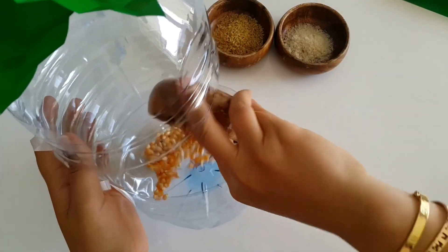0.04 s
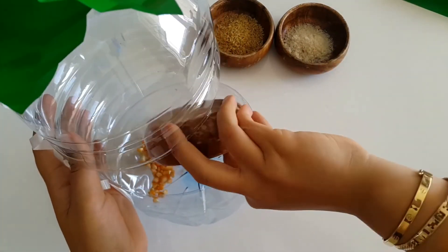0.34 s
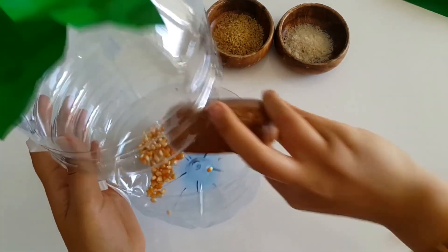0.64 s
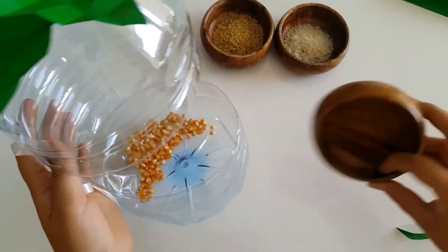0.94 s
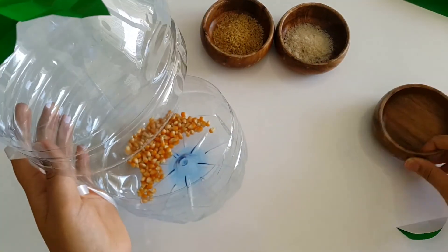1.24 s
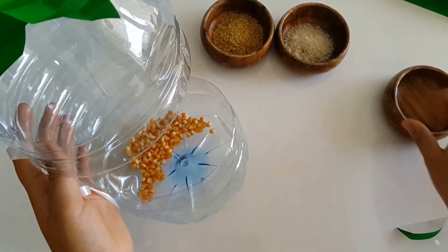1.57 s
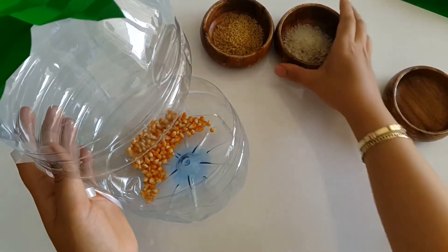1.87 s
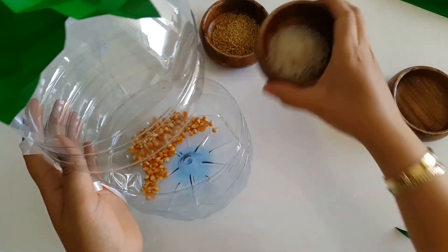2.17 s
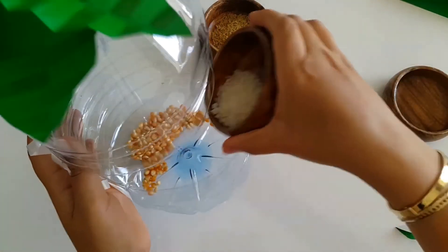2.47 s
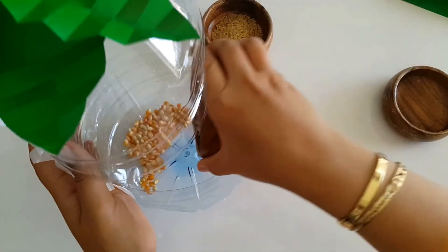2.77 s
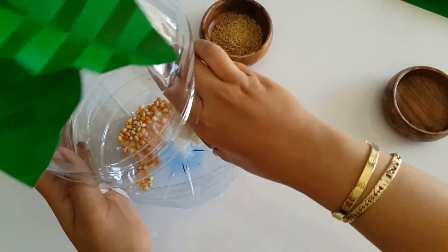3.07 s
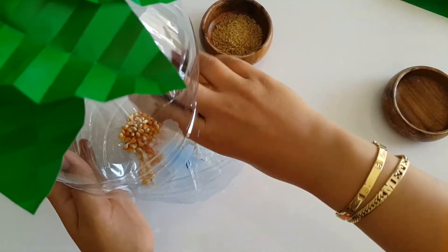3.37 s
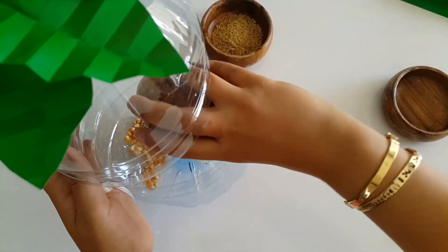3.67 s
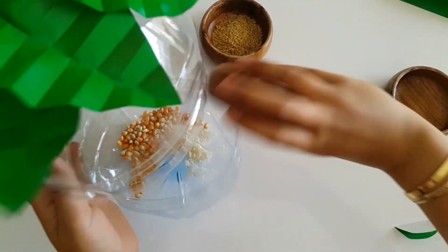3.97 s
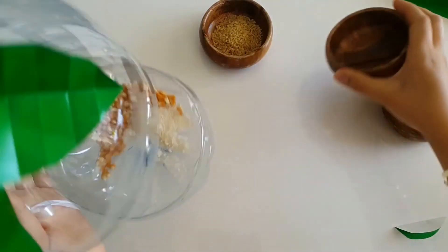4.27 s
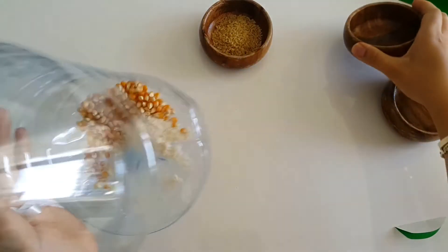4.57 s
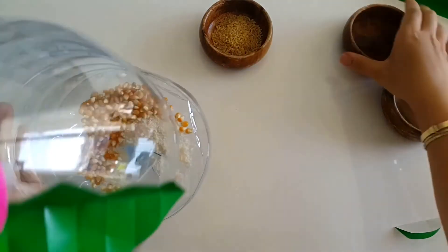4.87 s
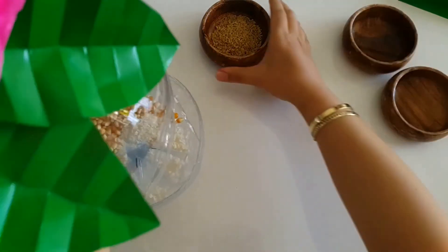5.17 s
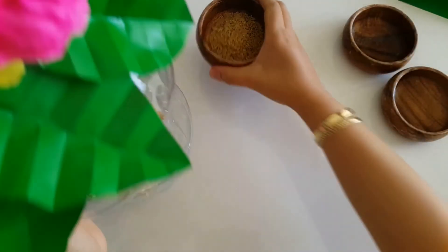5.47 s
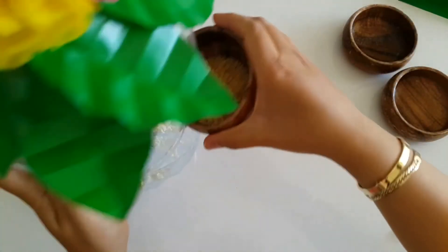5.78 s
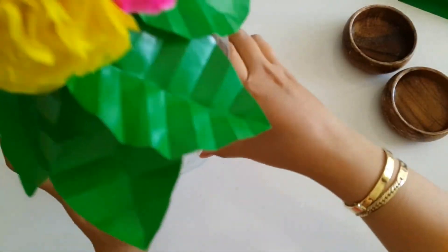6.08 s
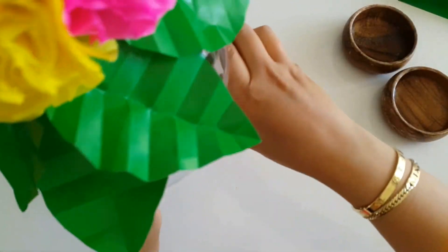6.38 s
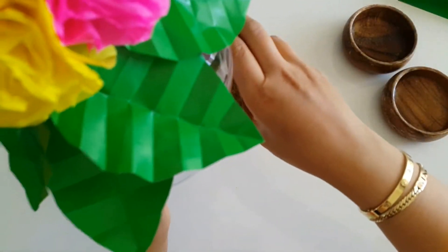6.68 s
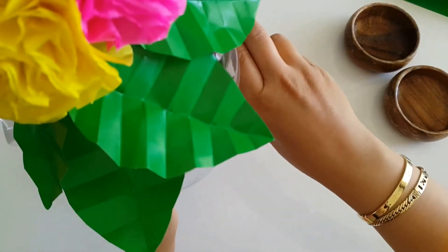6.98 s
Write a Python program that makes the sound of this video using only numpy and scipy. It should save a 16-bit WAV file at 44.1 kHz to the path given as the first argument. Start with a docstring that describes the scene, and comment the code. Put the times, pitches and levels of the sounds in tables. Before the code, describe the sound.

Dried corn, rice and millet patter from wooden bowls into a thin plastic bottle, with hollow bumps, table knocks and one loud crack.

```python
"""Corn clatters from a wooden bowl into a big cut-open plastic bottle on a table; rice and millet follow.
Grains patter on the thin wall in surges and ring the air inside. Bowls bump and scrape the bottle
and chatter when set down; once the wall buckles with a loud crack.
A close phone with a limiter hears it in a bare, live room; a faint engine drones far outside."""
import sys
import numpy as np
from scipy import signal
from scipy.fft import rfft, irfft, next_fast_len
from scipy.io import wavfile
from scipy.ndimage import uniform_filter1d, minimum_filter1d

SR = 44100
rng = np.random.default_rng(int(sys.argv[2]) if len(sys.argv) > 2 else 0)


def bounce(signal):
    """Save signal as a 16-bit WAV file at the path given by the first command-line argument."""
    frames = np.transpose(np.atleast_2d(signal))
    limited = np.clip(frames, -1, 1)
    pcm = np.round(limited * 32767).astype(np.int16)
    wavfile.write(sys.argv[1], SR, pcm)


N = 313992
TIME = np.arange(N) / SR

# corn on the wall: f/Hz, level/dB
CORN_SPECTRUM = [(35, -65), (60, -52.5), (120, -31), (156, -18.5), (343, -6.5), (475, -5.5), (627, -17.5),
                 (705, -6.5), (953, -8), (1250, -2.5), (1600, -2.5), (1950, -4), (3500, -2.5), (5710, -3.5),
                 (8090, -11.5), (12000, -12), (15500, -22.5)]
# rice on the wall: f/Hz, level/dB
RICE_SPECTRUM = [(59, -21), (100, -29), (129, -4), (188, -6.5), (280, 1.5), (386, 3), (601, -6.5),
                 (682, -2), (879, -0.5), (956, -7), (1290, -2), (2500, -10.5), (6200, -20), (8200, -27),
                 (15500, -28)]
# sliding mixture: f/Hz, level/dB
SLIDE_SPECTRUM = [(59, -66), (100, -40), (118, -33), (209, -31), (228, -17), (362, 0.5), (576, -10),
                  (774, -3.5), (1590, -1), (4100, -6), (15500, -32)]
# millet on the wall: f/Hz, level/dB
MILLET_SPECTRUM = [(59, -76), (100, -40), (129, -16), (253, -2), (370, 5.5), (640, -7.5), (697, -2.5),
                   (843, -5.5), (1210, 0), (1800, -3), (2420, -8.5), (2870, -7), (6200, -10), (8200, -17.5),
                   (15500, -20)]
# scraped wall: f/Hz, level/dB
SCRAPE_SPECTRUM = [(35, -66), (60, -19), (201, -14.5), (242, -9), (285, -7.5), (475, 0.5), (627, -11),
                   (705, -3.5), (1100, -11.5), (1520, -10.5), (2710, -16), (3050, -15), (15500, -44)]
# bumped wall: f/Hz, level/dB
WALL_SPECTRUM = [(40, -44), (100, -21.5), (200, -13), (320, -2.5), (500, -2.5), (590, -7.5), (750, -3),
                 (1400, -8.5), (2200, -9.5), (5500, -16), (8000, -25.5), (15000, -38)]
# ticks and clinks: f/Hz, level/dB
TICK_SPECTRUM = [(30, -42), (120, -10.5), (400, -13.5), (900, -1.5), (1600, 3.5), (3500, 2.5), (6200, 1),
                 (8000, -8.5), (15000, -14), (19000, -47)]
# buckling wall: f/Hz, level/dB
BUCKLE_SPECTRUM = [(40, -64.5), (130, -22.5), (400, -7), (1000, -5), (1600, 3.5), (3300, 3.5), (6200, 3),
                   (8200, -8.5), (15000, -15)]
# knocked table: f/Hz, level/dB
TABLE_SPECTRUM = [(40, -74), (70, -27), (100, -5), (160, 4.5), (230, 6), (500, 3.5), (850, 2), (1800, -2),
                  (2250, -9.5), (3100, -17), (4500, -27.5), (9000, -44), (15000, -68)]
# steady room noise: f/Hz, level/dB
NOISE_SPECTRUM = [(20, -30), (50, -15), (85, -17.5), (122, -2.5), (200, -13), (480, -9.5), (750, -17),
                  (1200, -17), (3300, -28), (4700, -24.5), (7500, -40.5), (15000, -38.5)]

# air modes of the bottle: f/Hz, width/Hz, lift/dB
AIR_MODES = [(130.5, 5.7, 15), (375, 20, 2.5), (496.7, 8.1, 4), (697, 38, 4), (799, 64, 2), (895, 18, 4.5),
             (1250, 33.7, 4.5), (1304, 140, 3), (1497, 62, 3), (1635, 74, 3.5)]
# table top modes: f/Hz, width/Hz, lift/dB
TOP_MODES = [(103, 19, 12.4), (229, 14, 6.5), (644, 92, 2.9), (1220, 160, 3.8)]
# table top ringing on: f/Hz, level/dB re knock, T60/s
TOP_RINGS = [(219.2, -4, 0.67), (277, -23, 0.45), (363, -12, 0.48), (400, -5.5, 0.19), (480, -8, 0.38),
             (542, -13.5, 0.43)]

# corn pour: t/s, hold/s, body level/dB, treble/dB re body
CORN_SURGES = [(-.02, 0.022, -19, -5.5), (.02, 0.028, -26, 1), (.12, 0.21, -32.5, 0),
               (.25, 0.21, -24, -2.5)]
# stray kernels: t/s, hold/s, body level/dB, treble/dB re body
STRAY_SURGES = [(.76, 0.069, -46.5, -6), (.88, 0.038, -42.5, -13), (1.04, 0.027, -57.5, -15)]
# rice shaken out: t/s, hold/s, body level/dB, treble/dB re body
RICE_SURGES = [(2.89, 0.053, -44, -3), (3.1, 0.017, -40, -2.5), (3.175, 0.015, -40.5, -1),
               (3.247, 0.0083, -39, -6), (3.312, 0.0082, -39, -3.5), (3.352, 0.014, -49, 4),
               (3.45, 0.026, -44, -4), (3.54, 0.038, -51.5, -6)]
# mixture slides as the bottle tilts: t/s, hold/s, body level/dB, treble/dB re body
SLIDE_SURGES = [(4.47, 0.073, -44, -6), (4.615, 0.014, -41.5, -0.5), (4.735, 0.031, -40, -2),
                (4.83, 0.11, -45, -0.5)]
# millet pour: t/s, hold/s, body level/dB, treble/dB re body
MILLET_SURGES = [(6.02, 0.27, -55, -7), (6.52, 0.15, -52.5, -6), (6.68, 0.045, -47, -10),
                 (6.935, 0.065, -38.5, 8.5), (7.11, .01, -39, -7)]
# bowl scrapes the wall: t/s, hold/s, body level/dB, treble/dB re body
SCRAPE_SURGES = [(2.612, 0.016, -38, 5.5), (2.635, 0.024, -30.5, -9.5), (3.62, 0.032, -33.5, -10.5),
                 (3.878, 0.013, -38.5, -4), (3.905, 0.062, -34, -3.5), (4.003, 0.016, -28, -6),
                 (4.056, 0.041, -23.5, -8), (4.14, 0.043, -25.5, 1.5), (5.84, 0.066, -44.5, 3.5),
                 (6.365, 0.012, -53, -4.5), (6.42, 0.023, -48.5, -5)]

# hard corn hits on the base: t/s, level/dB, spot f/Hz
KERNEL_HITS = [(0.0024, -8.5, 1180), (0.0259, -14, 1440), (0.055, -11.5, 1240), (0.0615, -18.5, 1260),
               (0.098, -17, 1520), (0.1197, -16, 1220), (0.1344, -15, 1540), (0.1671, -18, 1670),
               (0.184, -15, 1500), (0.2346, -19, 1480), (0.253, -9.5, 1690), (0.2751, -21, 1300),
               (0.3256, -13.5, 1330), (0.378, -12, 1590), (0.4505, -20, 1530), (0.5064, -25, 1380),
               (0.568, -18, 1540), (0.594, -16.5, 1480), (0.6153, -20, 1350), (0.6266, -21, 1410)]
# bowl bumps the bottle: t/s, level/dB, tilt/(dB/oct), room send/dB,
# panel f/Hz, panel lift/dB, ring f/Hz, ring/dB re blow
BOWL_BUMPS = [(0.741, -22.5, -3.5, 0.5, 390, 9.5, 380, -2), (.814, -14, -0.5, -3, 1380, 20, 800, -7.5),
              (.872, -10.5, -1, 3.5, 906, -8, 922, -5.5), (.876, -16, -8.5, -13, 256, 14, 370, 5.5),
              (.932, -8.5, 1, -4.5, 470, 12, 464, -7.5), (.938, -11, 0, -8.5, 750, 6, 226, -17),
              (.961, -13, -4, -2, 520, 24, 517, -9), (1.002, -26.5, 0, 5.5, 510, 19, 464, -17),
              (2.442, -20.5, -1, -1.5, 1570, 8, 336.7, -13), (2.448, -17, -4, -6, 354, 3, 517, -20),
              (2.477, -26.5, -2.5, -3, 1700, 16, 338, -10), (2.62, -17, 2, 5, 1530, 11, 513, 0.5),
              (2.624, -9, -7, -1.5, 351, 9, 130.5, -8), (2.851, -29.5, -5.5, 8, 377, 11, 383, -3),
              (2.925, -26.5, -3.5, 4.5, 398, 18, 407, -3), (3.026, -32.5, -1.5, 6.5, 750, 3, 369, -4),
              (3.615, -22.5, -3.5, 1.5, 330, 12, 363, -5), (3.652, -4.5, -3, 5.5, 340, 6, 604, -4),
              (3.655, 0.5, -4.5, -6, 894, 27.5, 909, -14.5), (3.995, -13, 0, 4.5, 500, 0.5, 502, -14),
              (4.066, -9, 1, -7, 770, 7, 528, -5.5), (4.097, -12, 1.5, -7, 1100, 7, 469, -5),
              (4.133, -2.5, 1, -3, 468, 5, 365, -10.5), (4.14, -5.5, 2.5, -9, 3120, 9, 485, -2.5),
              (5.806, -31.5, 2, 4, 1280, 19, 782, 0), (5.811, -22, -4, -5, 288, 6, 305, -9),
              (5.892, -20, 6, -2, 1280, 22, 787, -5), (5.896, -11, -2, -2.5, 220, 5.5, 473.5, -8.5),
              (5.922, -18.5, -6.5, -0.5, 462, 27, 462, -6), (6.129, -35, -0.5, 4, 1300, -3, 1260, -17),
              (6.42, -29.5, 0, -4, 1290, 23, 1266, -14), (6.496, -24, 2.5, -11, 1330, 21, 1340, -19)]
# small sharp ticks (kernels, plastic snaps, a bright bracelet clink, a bowl touching the table):
# t/s, level/dB, tilt/(dB/oct)
SHARP_TICKS = [(0.027, -8.5, -0.5), (.084, -9, 1), (0.13, -10, 1), (0.152, -6.5, 6.5), (.189, -10, 6),
               (0.222, -7, 4), (0.245, -8, 10), (0.348, -12, 4), (.38, -15, 3), (.415, -12, 6),
               (.506, -10, 9), (0.626, -10.5, -1), (1.049, -25, -2), (1.122, -30.5, 0.5),
               (1.199, -28.5, -4), (2.212, -33, 14), (2.235, -42, 9), (2.672, -18.5, -3.5),
               (2.905, -32.5, -6), (2.937, -42, -3), (3.025, -31.5, 3), (3.092, -37, 8), (3.245, -30, -0.5),
               (3.318, -32, -1.5), (3.471, -33, -5), (3.645, -19, 4), (4.984, -12, -4.5),
               (5.175, -36.5, -2.5), (5.249, -30, -3.5), (5.299, -35.5, -2.5), (6.064, -31.5, -0.5),
               (6.443, -30, -7), (6.496, -28, 5.5), (6.553, -29.5, 4), (6.607, -25, 1), (6.65, -17.5, 2.5),
               (6.661, -16.5, 3), (6.748, -16, 2), (6.819, -18.5, -3), (6.844, -18, 3.5), (7.108, -21, 1)]
# tipped bowl clinks: t/s, level/dB, f/Hz
BOWL_CLINKS = [(2.514, -27, 2480), (2.533, -29, 2520), (6.127, -30, 3520), (6.138, -36, 3530)]
# bowl lands on the table: t/s, level/dB, tilt/(dB/oct), thud f/Hz, loss per rebound/dB
BOWL_LANDINGS = [(1.431, -6.5, -0.1, 517, 30), (1.593, -9.5, 0.6, 413, 11), (4.84, -17.5, 3, 283, 4),
                 (4.991, -16.5, 3.5, 287, 5), (5.04, -23, 4.5, 278, 2)]
# far engine: t/s, firing f/Hz, level/dB
ENGINE_CURVE = [(0, 67.44, -68), (1.3, 80.7, -62.5), (2.3, 89.8, -58.5), (3.0, 91.2, -67), (3.6, 74.4, -68),
                (7.1, 65.3, -111)]

# room decay: f/Hz, T60/s
ROOM_DECAY = [(100, .5), (400, .45), (1500, .48), (4000, .41), (12000, .36)]
# diffuse field width: f/Hz, side/dB re mid
DIFFUSE_SIDE = [(100, -12.5), (300, -13), (600, -6), (1200, -1.5), (3000, -0.5), (12000, 1)]
# microphone imbalance: f/Hz, left/dB re right
MIC_BALANCE = [(200, -0.5), (1000, -1), (2400, -0.5), (4400, -4), (8000, -4), (15000, -1)]


def grains():
    """Corn, strays, rice, sliding mixture and millet patter on the wall. Rows: left, right, room send."""
    corn = surges(CORN_SURGES, rise_db_per_s=93, fall_db_per_s=68.5, dulling=1.0)
    strays = surges(STRAY_SURGES, rise_db_per_s=140, fall_db_per_s=61, dulling=0.12)
    rice = surges(RICE_SURGES, rise_db_per_s=600, fall_db_per_s=419, dulling=0.032)
    slide = surges(SLIDE_SURGES, rise_db_per_s=181, fall_db_per_s=301, dulling=0.11)
    millet = surges(MILLET_SURGES, rise_db_per_s=92, fall_db_per_s=85, dulling=0.35)
    return (patter(corn, CORN_SPECTRUM, hits_per_s=1000, scatter_db=3.2, room_db=0.5, rattle_s=0.00059)
            + patter(strays, CORN_SPECTRUM, hits_per_s=260, scatter_db=3, room_db=3.0)
            + patter(rice, RICE_SPECTRUM, hits_per_s=1000, scatter_db=1.0, room_db=0.5)
            + patter(slide, SLIDE_SPECTRUM, hits_per_s=1100, scatter_db=2.5, room_db=0.5)
            + patter(millet, MILLET_SPECTRUM, hits_per_s=1200, scatter_db=2.5, room_db=-2.5))


def surges(rows, rise_db_per_s, fall_db_per_s, dulling, floor_db=-75):
    """Body and treble gains of a flow; as it thins, treble loses an extra `dulling` dB per dB."""
    power = np.zeros((2, N))
    for t_s, hold_s, level_db, treble_db in rows:
        drop_db = rise_db_per_s * np.maximum(t_s - TIME, 0)
        drop_db += fall_db_per_s * np.maximum(TIME - t_s - hold_s, 0)
        heard = level_db - drop_db > floor_db
        body_db = level_db - drop_db[heard]
        power[:, heard] += undb([body_db, body_db + treble_db - dulling * drop_db[heard]]) ** 2
    return np.sqrt(power)


def patter(flow, spectrum, hits_per_s, scatter_db, room_db, rattle_s=0.0013, split_hz=2700, spots=12):
    """Random impacts, in clumps, rattle several spots of the wall and ring the air inside."""
    clump_s, clump_db = 0.023, 1.84
    start, end = np.flatnonzero(flow[0])[[0, -1]]
    length, age_s = end - start, TIME[:SR // 50]
    hits = np.zeros((2, length))
    for _ in range(spots):
        wait, force, sign = rng.random((2000, 3)).T
        onsets = (np.cumsum(-np.log(wait)) * spots / hits_per_s * SR).astype(int)
        strength = np.sign(sign - .5) * undb(scatter_db * np.minimum(-np.log(force), np.pi))
        impulses = np.bincount(onsets[onsets < end], strength[onsets < end], end)[start:]
        rattle = unit(diffuse(len(age_s)) * np.exp(-age_s / rattle_s))
        hits += convolve(impulses, rattle)[:, :length]
    wall = convolve(hits, response(spectrum, AIR_MODES))[:, :length]
    crossover = (signal.butter(3, split_hz, kind, fs=SR, output="sos") for kind in ("low", "high"))
    body, treble = (unit(signal.sosfilt(sos, wall)) for sos in crossover)
    clumps = undb(clump_db * drift(clump_s))
    direct = (body * flow[0, start:end] + treble * flow[1, start:end]) * clumps[start:end]
    track = np.vstack([direct, undb(room_db) * direct[0]])
    return np.pad(track, ((0, 0), (start, N - end)))


def kernels(track):
    """Corn lands hard on the base; each spot clacks at its own pitch."""
    for t_s, level_db, spot_hz in KERNEL_HITS:
        clack = response(CORN_SPECTRUM, [(spot_hz, 570, 17.5)])
        waves = bending_waves(share=0.11, swell_s=0.0019)
        add_blow(track, t_s, clack, waves, level_db, room_db=0.5, burst_s=0.0016)


def scrapes():
    """The thin wall crackles as a bowl scrapes in or out."""
    flow = surges(SCRAPE_SURGES, rise_db_per_s=606, fall_db_per_s=901, dulling=0.055)
    return patter(flow, SCRAPE_SPECTRUM, hits_per_s=1400, scatter_db=2.5, room_db=-1.0)


def bumps(track, width_ratio=0.21):
    """A bowl strikes a panel: the bottle booms and rings hollow."""
    for t_s, level_db, tilt_db_per_oct, room_db, panel_hz, lift_db, ring_hz, ring_db in BOWL_BUMPS:
        panel = (panel_hz, width_ratio * panel_hz, lift_db)
        boom = response(WALL_SPECTRUM, AIR_MODES + [panel], tilt_db_per_oct)
        waves = bending_waves(share=0.055, swell_s=0.0022, contact_s=0.000096)
        add_blow(track, t_s, boom, waves, level_db, room_db, burst_s=0.00061)
        add_ring(track, t_s, ring_hz, level_db + ring_db, t60_s=0.44, burst_s=0.00062)


def ticks(track):
    """Small sharp ticks: kernels, plastic snaps, a bright bracelet clink, a bowl touching the table."""
    for t_s, level_db, tilt_db_per_oct in SHARP_TICKS:
        tick = response(TICK_SPECTRUM, AIR_MODES, tilt_db_per_oct)
        waves = bending_waves(share=0.14, swell_s=0.002)
        add_blow(track, t_s, tick, waves, level_db, room_db=-2, burst_s=0.0003)


def clinks(track):
    """A tipped bowl clinks lightly: one high resonance."""
    for t_s, level_db, pitch_hz in BOWL_CLINKS:
        clink = response(TICK_SPECTRUM, [(pitch_hz, 260, 15.5)], tilt_db_per_oct=-2.5)
        waves = bending_waves(share=0.11, swell_s=0.0016)
        add_blow(track, t_s, clink, waves, level_db, room_db=0.5, burst_s=0.00026)


def buckle(track, t_s=4.13):
    """The wall buckles with a loud crack."""
    crack = response(BUCKLE_SPECTRUM, AIR_MODES)
    waves = bending_waves(share=0.32, swell_s=0.0017, contact_s=0.00002)
    add_blow(track, t_s, crack, waves, level_db=6, room_db=-2.5, burst_s=0.00018)


def set_downs(track, contacts=7, rebound_s=0.006):
    """An empty bowl rings the table top and chatters on its foot, each rebound weaker."""
    for t_s, level_db, tilt_db_per_oct, thud_hz, loss_db in BOWL_LANDINGS:
        knock = response(TABLE_SPECTRUM, TOP_MODES + [(thud_hz, 0.53 * thud_hz, 4)], tilt_db_per_oct)
        for ring_hz, ring_db, t60_s in TOP_RINGS:
            add_ring(track, t_s, ring_hz, level_db + ring_db, t60_s, burst_s=0.00033)
        for rebound, jitter in enumerate(rng.random(contacts)):
            waves = bending_waves(share=0.13, swell_s=0.0006)
            contact_db = level_db - rebound * loss_db
            add_blow(track, t_s, knock, waves, contact_db, room_db=1.5, burst_s=0.00069)
            t_s += rebound_s * (.5 + jitter)


def bending_waves(share, swell_s, contact_s=0.00003):
    """A short push, then waves that swell and die in the sheet and spread the blow in stereo."""
    age_s = TIME[:SR // 30]
    push = age_s / contact_s * np.exp(-age_s / contact_s)
    envelope = age_s / swell_s * np.exp(1 - age_s / swell_s)
    return push / push.sum() + share * diffuse(len(age_s)) * envelope


def add_blow(track, t_s, body, waves, level_db, room_db, burst_s):
    """One blow with the energy of a burst at level_db; only the direct sound passes through `waves`."""
    start = int(t_s * SR)
    direct, send = unit(convolve(body, waves)), unit(body)
    gain = undb(level_db) * np.sqrt(burst_s * SR)
    length = min(len(body), N - start)
    track[:2, start:start + length] += gain * direct[:, :length] / np.sqrt(direct.shape[1])
    track[2, start:start + length] += gain * undb(room_db) * send[:length] / np.sqrt(len(send))


def add_ring(track, t_s, hz, level_db, t60_s, burst_s, swell_s=0.0015):
    """A clean resonance swells after a blow and dies away."""
    age_s = TIME[:SR // 2]
    envelope = (1 - np.exp(-age_s / swell_s)) * np.exp(-np.log(1000) * age_s / t60_s)
    ring = np.sin(2 * np.pi * hz * age_s) * envelope
    add_blow(track, t_s, ring, np.ones(1), level_db, room_db=-14, burst_s=burst_s)


def echoes(send, paths=4, turns_per_s=19):
    """Sound leaves from changing places: echo paths take turns at constant total power."""
    offsets = ((turns_per_s * TIME - path + 1) % paths - 1 for path in range(paths))
    fades = (np.sqrt(np.maximum(1 - np.abs(offset), 0)) for offset in offsets)
    return sum(convolve(send * fade, room_response()) for fade in fades)


def room_response(gap_s=0.0018, plateau_s=0.003, size=32768):
    """Unit-energy reverb: gap, plateau of early echoes, tail whose treble dies first."""
    hz, age_s, cells = signal.stft(diffuse(size), SR, nperseg=256)
    decay_db = -60 * np.maximum(age_s - plateau_s, 0) / over_hz(hz, ROOM_DECAY)[:, None]
    tail = signal.istft(cells * undb(decay_db), SR)[1]
    fade_in = np.clip(np.arange(tail.shape[1]) / SR / gap_s - .5, 0, 1)
    return unit(tail * fade_in) / np.sqrt(tail.shape[1])


def engine(waver=0.0312, overtone_db=-10):
    """Far drone: a wavering firing rate and its octave."""
    t_s, firing_hz, level_db = np.transpose(ENGINE_CURVE)
    pitch_hz = np.interp(TIME, t_s, firing_hz) * (1 + waver * drift(0.1))
    phase = 2 * np.pi * np.cumsum(pitch_hz) / SR
    drone = unit(np.sin(phase) + undb(overtone_db) * np.sin(2 * phase))
    return drone * undb(np.interp(TIME, t_s, level_db))


def room_noise(level_db=-54):
    """Soft, steady noise from all sides."""
    return undb(level_db) * unit(convolve(diffuse(next_fast_len(N)), response(NOISE_SPECTRUM)))


def diffuse(size):
    """Stereo noise from all directions: alike in the bass, unrelated in the treble."""
    mid, side = rfft(rng.standard_normal((2, size)))
    share = undb(over_hz(np.fft.rfftfreq(size, 1 / SR), DIFFUSE_SIDE))
    return irfft(np.array([mid + share * side, mid - share * side]) / np.sqrt(1 + share ** 2), size)


def response(spectrum, modes=(), tilt_db_per_oct=0, size=16384):
    """Minimum-phase impulse response of a body. Modes: f/Hz, width/Hz, lift/dB."""
    hz = np.fft.rfftfreq(size, 1 / SR)
    db = over_hz(hz, spectrum) + tilt_db_per_oct * np.log2(np.maximum(hz, 200) / 1000)
    for centre_hz, width_hz, lift_db in modes:
        db += lift_db / (1 + (2 * (hz - centre_hz) / width_hz) ** 2)
    cepstrum = irfft(np.log(undb(db)))
    cepstrum[1:size // 2] *= 2
    cepstrum[size // 2 + 1:] = 0
    return irfft(np.exp(rfft(cepstrum)))


def drift(window_s):
    """Smoothed noise, rms 1."""
    return unit(uniform_filter1d(rng.standard_normal(N), int(window_s * SR)))


def convolve(x, h):
    """Convolve per channel, at most N samples."""
    return signal.oaconvolve(np.atleast_2d(x), np.atleast_2d(h), axes=1)[:, :N]


def over_hz(hz, points):
    """Interpolate (f/Hz, value) points in log frequency."""
    knots_hz, values = np.transpose(points)
    return np.interp(np.log(hz + 1), np.log(knots_hz), values)


def undb(db):
    """dB to gain."""
    return 10 ** (np.asarray(db) / 20)


def unit(x):
    """Scale to rms 1."""
    return x / np.sqrt(np.mean(x ** 2))


def scene():
    """Grains, bottle and bowls in the room: left microphone earlier, right brighter."""
    track = grains() + scrapes()
    for add_source in (bumps, kernels, ticks, clinks, buckle, set_downs):
        add_source(track)
    left, right, send = track
    right = np.pad(right, (3, 0))[:N]  # 3 samples late
    mics = [response([(hz, side * db / 2) for hz, db in MIC_BALANCE]) for side in (1, -1)]
    return convolve(np.array([left, right]) + echoes(send), mics) + engine() + room_noise()


def record(dry, ceiling=0.98, look_ahead_s=0.016, release_db_per_s=210, top_hz=16000):
    """Look-ahead limiter: ducks just before a peak, recovers at a steady rate; then a low-pass."""
    ahead = int(look_ahead_s * SR)
    peak = np.abs(dry).max(axis=0) + 1e-9
    needed_db = 20 * np.log10(np.minimum(1, ceiling / peak))
    held_db = minimum_filter1d(needed_db, 2 * ahead + 1)
    recovery_db = release_db_per_s * TIME
    gain_db = np.minimum.accumulate(held_db - recovery_db) + recovery_db
    gain = undb(uniform_filter1d(gain_db, ahead // 2))
    return signal.sosfilt(signal.ellip(8, .2, 70, top_hz, fs=SR, output="sos"), dry * gain)


dry = scene()
out = record(dry)
bounce(out)
```